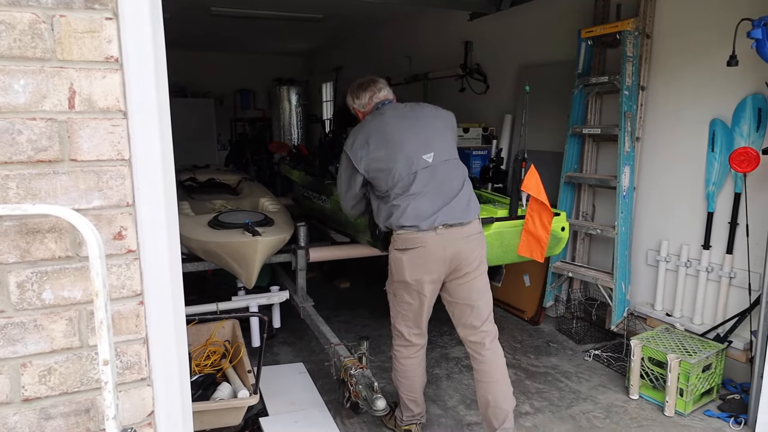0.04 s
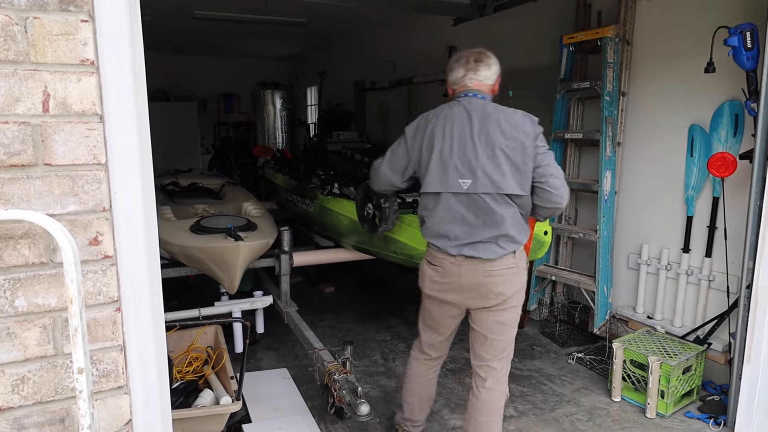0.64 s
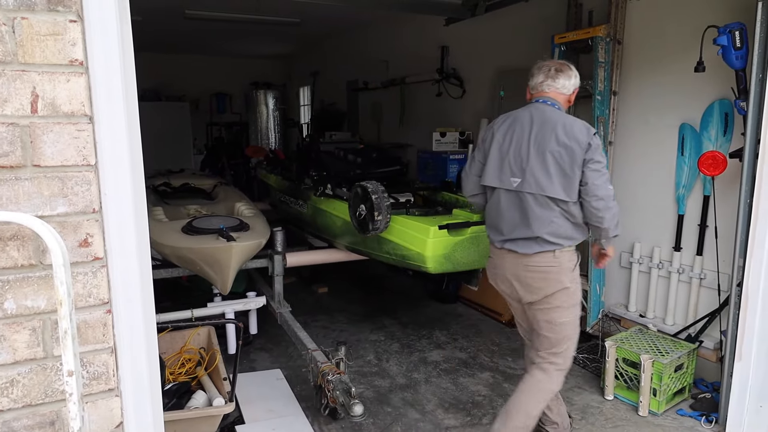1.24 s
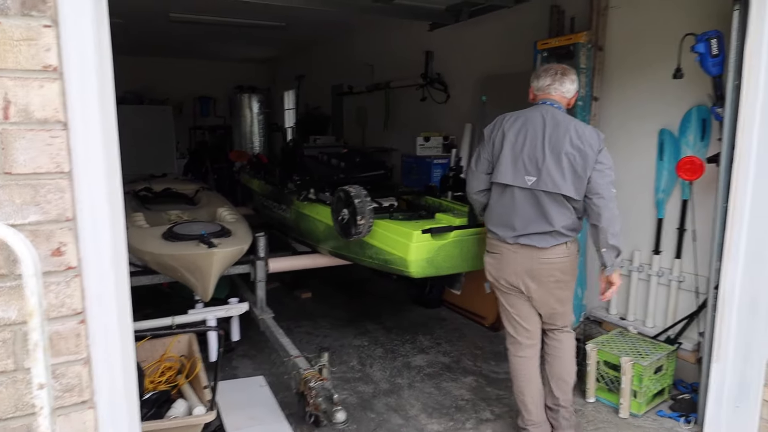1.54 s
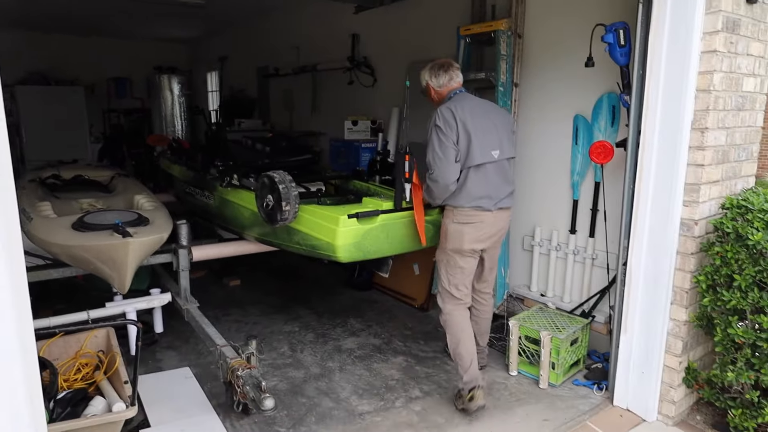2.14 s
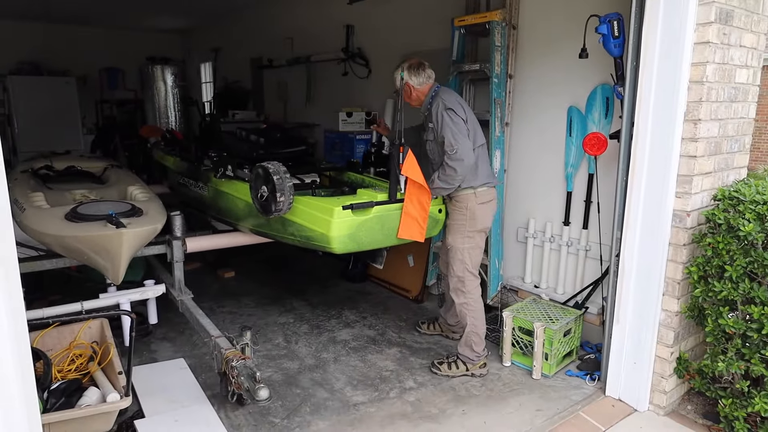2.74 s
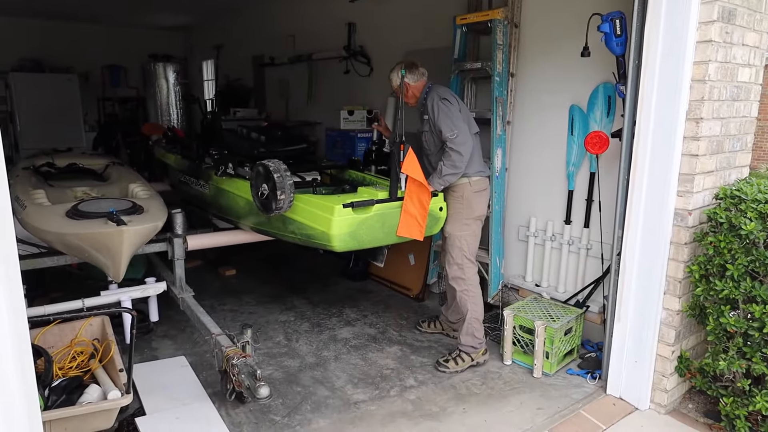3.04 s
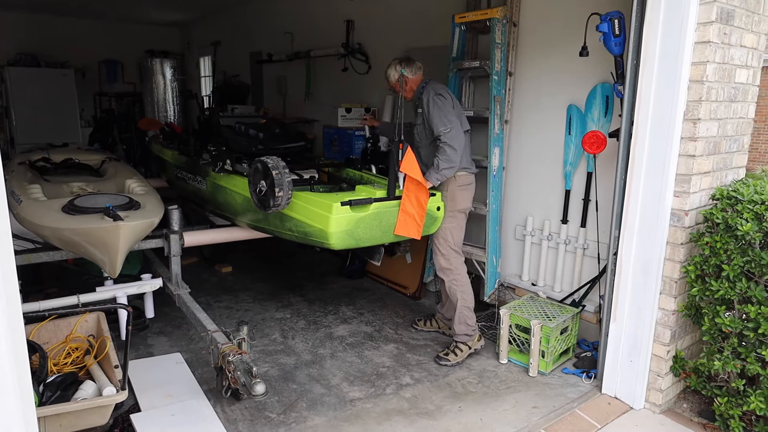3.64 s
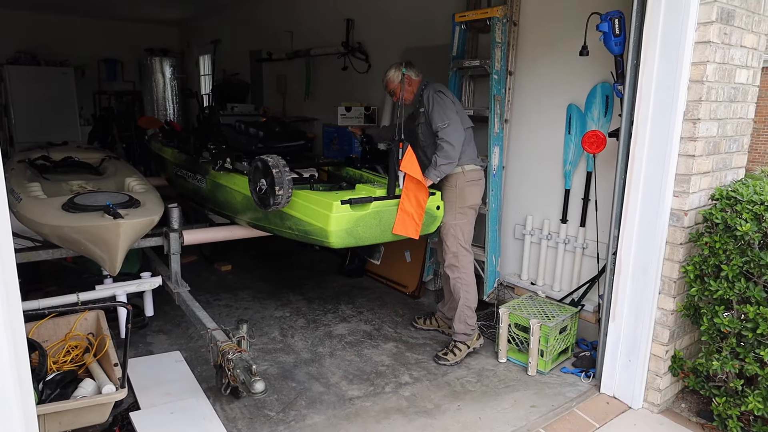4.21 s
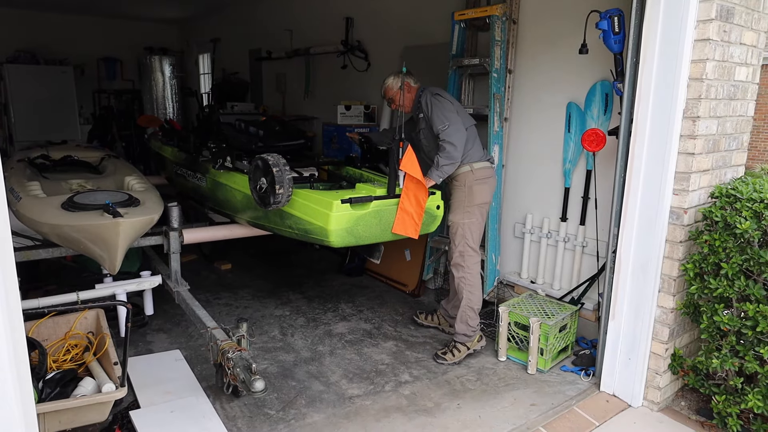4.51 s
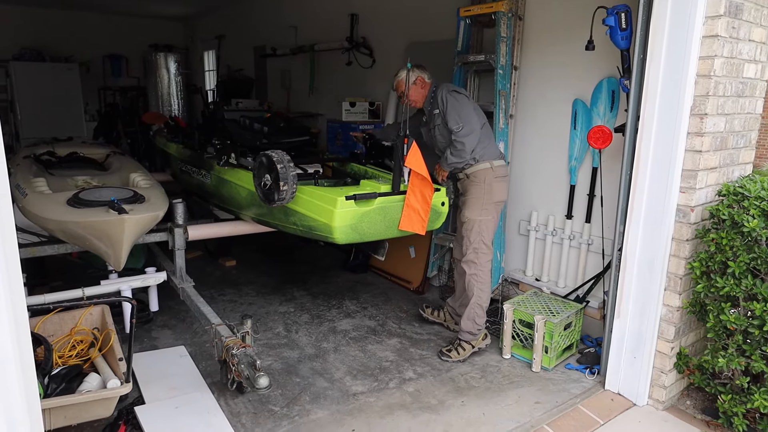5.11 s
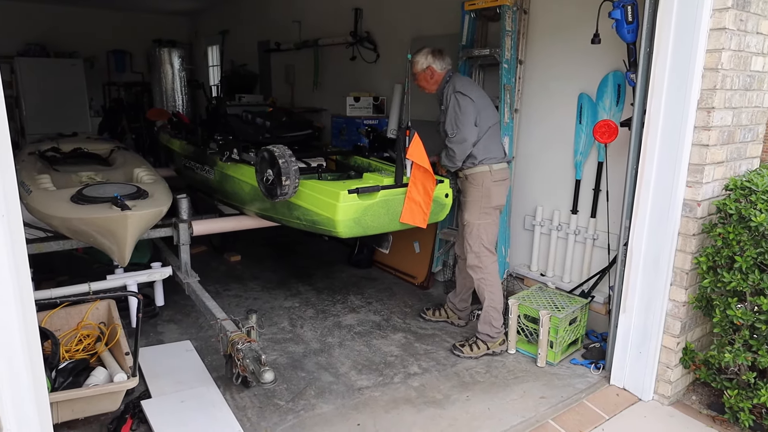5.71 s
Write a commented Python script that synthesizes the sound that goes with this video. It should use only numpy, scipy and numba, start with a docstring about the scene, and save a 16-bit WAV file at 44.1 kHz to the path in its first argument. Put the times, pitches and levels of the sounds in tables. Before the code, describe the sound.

In an open garage, a metal wheel leg on a plastic kayak snaps loudly into place, ringing briefly as the hollow hull booms. Soft footsteps, light taps and rubbing clothes follow. A second leg knocks loose and snaps home just as loudly, then quiet handling continues. A faint pump-like buzz and soft outdoor air run underneath, and the microphone picks up a short room echo.

```python
"""First you hear a steady buzz, like a small pump, in soft outdoor air, with a low rumble and a rustle.
A man in an open garage swings up the two stern wheels of a plastic kayak, walking round between them.
His clothes rub, his shoes scuff, and the hollow hull rumbles as he leans on it. Each metal leg knocks
loose and snaps into its stop, so the leg rings and the hull booms. A limiter (an automatic volume
control) squashes the two loud snaps, which makes the garage's echo stand out."""
import sys
import numpy as np
from scipy import signal
from scipy.fft import rfft, irfft
from scipy.io import wavfile
from scipy.ndimage import uniform_filter1d
from numba import njit

SR = 44100
rng = np.random.default_rng(int(sys.argv[2]) if len(sys.argv) > 2 else 0)


def to_wav(sig):
    """Store sig (one row per channel, or 1-D mono) as 16-bit WAV at the path in sys.argv[1].

    Samples outside -1..1 are clipped; the rate is SR.
    """
    pcm = np.clip(np.atleast_2d(sig), -1, 1) * 32767
    pcm = np.round(pcm).astype(np.int16)
    wavfile.write(sys.argv[1], SR, pcm.T)  # frames by channels


N = 254016
TIME = np.arange(N) / SR
TAIL = np.arange(SR) / SR  # one second, for sounds that die away

# Levels in the tables are relative. The pump's strongest harmonics: f/Hz, level/dB
PUMP_STRONG = [(672.9, -56.5), (726.7, -59.5), (893.6, -59.5), (952.8, -53), (1007, -61), (1120, -75.5),
               (1174, -52), (1233, -51), (1287, -56), (1340, -48.5), (1400, -47.5), (1567, -67),
               (1620, -52), (1846, -66.5)]
# outline of its weaker harmonics: f/Hz, level/dB
PUMP_FAINT = [(56, -67), (112, -64.5), (280, -63.5), (500, -72), (1500, -66), (2300, -71), (2950, -64.5),
              (3250, -84.5), (4100, -71.5), (4700, -83.5), (5200, -82), (5600, -104), (6200, -108)]
# its treble over time: t/s, level/dB
PUMP_BRIGHTNESS = [(0, -6.5), (2.9, -2.5), (4.4, 1), (5.7, 3)]
# tone of the outdoor air: f/Hz, level/dB
AIR_TONE = [(20, -28.5), (40, -10.5), (60, 3), (110, 6.5), (180, -9), (320, 0.5), (500, -10), (1300, -0.5),
            (2000, -6.5), (3000, -20.5), (5000, -22.5), (6200, -63.5), (8000, -63), (16000, -75)]
# pushes on the hull: t/s, rise/s, level/dB
HULL_PUSHES = [(0.0, 0.087, -38.5), (0.201, .12, -28), (.76, 0.057, -28.5), (1.14, 0.062, -41),
               (2.33, 0.07, -44), (2.561, 0.14, -37), (3.03, 0.084, -40), (3.141, 0.056, -46),
               (3.331, 0.13, -27), (4.07, 0.043, -33), (4.43, 0.15, -37.5), (4.86, 0.098, -44.5),
               (5.02, 0.24, -42.5), (5.221, 0.15, -37), (5.57, 0.074, -46)]
# tone of their rumble: f/Hz, level/dB
PUSH_TONE = [(40, -14), (90, -0.5), (165, 4.5), (300, 1), (450, -8.5), (900, -13), (2000, -65)]
# strokes of sleeves and soles: t/s, rise/s, level/dB, brightness/(dB per octave)
RUB_STROKES = [(0.0, 0.069, -43, -9), (1.08, 0.089, -49, 2), (1.42, 0.18, -44.5, -1), (2.07, 0.15, -40, -5),
               (2.18, 0.13, -48.5, 13.5), (2.358, 0.054, -39.5, -7), (2.56, 0.054, -38, 0),
               (2.96, .14, -45.5, 1), (3.15, .06, -43.5, 2.5), (4.26, 0.028, -49.5, -3.5),
               (4.44, 0.14, -49.5, -1), (4.64, 0.052, -41.5, 0), (5.26, 0.11, -49, 1.5),
               (5.45, 0.14, -49.5, 2)]
# tone of that rubbing: f/Hz, level/dB
RUB_TONE = [(300, -32), (800, -21), (2200, 12), (3500, 7.5), (5500, -6.5), (7200, -30.5), (9000, -69),
            (12000, -61)]
# steps and light taps, each with one resonance (a peak in its tone):
# t/s, level/dB, peak f/Hz, peak height/dB, treble slope/(dB per octave), hull thump/dB
STEPS_AND_TAPS = [(.246, -36, 2000, 19, -31, -5), (0.276, -34, 500, -2, -22, 16.5),
                  (.592, -12.5, 7800, -17, 15, 2), (0.953, -36, 2650, 2, -21.5, 0),
                  (1.205, -36.5, 900, 9, -31, 4.5), (1.227, -32.5, 3000, 8, -7, -20),
                  (1.622, -33.5, 800, 5, -9, -8), (1.683, -33, 950, 15, -9, -15.5),
                  (1.702, -31, 800, 16, -12, -14), (2.037, -41, 860, 15, -18, -5),
                  (2.053, -36.5, 4500, 10, -11, -14), (2.352, -40.5, 720, 27, -16, 8),
                  (2.409, -36, 830, 19, -6.5, -19), (2.596, -29.5, 2200, 10, -9, -18),
                  (2.634, -38.5, 3000, 7, -2.5, -12), (3.212, -31.5, 2000, 5.5, -11.5, 2),
                  (3.369, -34, 1394, 1, -9.5, 2.5), (4.685, -37, 3350, 25, 6, -14),
                  (4.708, -28.5, 3300, 11, -5, 0), (5.308, -35.5, 1900, 14, -14, 15),
                  (5.501, -35, 1800, 1, -27, 9.5)]
# tone of struck plastic: f/Hz, level/dB
CONTACT_TONE = [(25, -43.5), (60, -4.5), (130, -3), (250, 1), (500, 0), (900, -3), (1700, 2), (3500, -3.5),
                (5200, -7.5), (7500, -16.5), (10500, -27), (14000, -39), (16000, -43.5)]
# notes the hollow hull rings at: f/Hz, level/dB, time to fade by 60 dB/s
HULL_MODES = [(110.7, -13.5, .42), (154, -8.5, 0.47), (165.5, 3, 0.31), (207.7, -6.5, 0.18),
              (222.2, -4.5, 0.34), (256.6, -3.5, 0.39), (296.3, 1, 0.35), (348, -8, 0.44),
              (407, -9.5, 0.13), (578, -14.5, 0.58), (717, -7.5, 0.27)]
# blows of the wheel legs: t/s, level/dB, peak f/Hz, peak height/dB, peak width/octaves,
# treble slope/(dB per octave), hull thump/dB, leg ring/dB, pan to the left/dB
LEG_BLOWS = [(0.301, -14.5, 2600, 1.5, 0.38, -11.5, 10.5, -7, 2),
             (.316, 30, 2360, 5, 0.25, 4, -7, -1.5, -1), (0.704, -7.5, 2100, 8.5, 0.34, -25, 1, -1.5, -2),
             (3.398, -14, 1225, 10.5, 0.27, -5, -2.5, -4.5, -1),
             (3.422, -25, 250, 1.5, 0.48, -6.5, 15.5, -8.5, 0),
             (3.445, -11, 2600, 11.5, 0.058, 3, 4, -14, -1.5), (3.628, 25.5, 4550, 8, 0.26, 6, -6.5, 0, 0)]
# resonances of each metal leg: f/Hz, width/Hz, height/dB
LEFT_LEG_MODES = [(1780, 43, 5.5), (1920, 52, 9.5), (2033, 25, -4.5), (2163, 66, -4), (2244, 45, 7.5),
                  (3376, 48, 15.5), (3760, 49, -1.5), (3745, 26, 12.5), (3540, 63, 15.5), (4310, 96, 12),
                  (4900, 12, 12.5)]
RIGHT_LEG_MODES = [(1600, 19, 13.4), (1720, 40, 5), (2576, 84, 9.9), (3270, 70, 4), (3280, 110, 6),
                   (3330, 40, 14), (3620, 21, 11), (4650, 60, 4), (4650, 52, 4), (4914, 16, 9.7),
                   (6990, 240, 6.6)]


def undb(db):
    """Turn decibels into a gain."""
    return 10 ** (np.asarray(db) / 20)


def pan(left_db):
    """Left and right gains that differ by left_db."""
    return undb(np.array([[left_db], [-left_db]]) / 2)


def fade(t60):
    """One second of decay, falling 60 dB every t60 seconds."""
    return np.exp(-np.log(1000) * TAIL / t60)


def spectrum(points, hz):
    """Read the level at hz from a curve of (Hz, dB) points."""
    f, db = np.transpose(points)
    return np.interp(np.log(hz + 1), np.log(f), db)


def noise(size, apart_hz=2300):
    """Stereo noise: left and right are alike in the bass, unrelated in the treble."""
    hz = np.fft.rfftfreq(size, 1 / SR)
    alike = .99 / (1 + (hz / apart_hz) ** 2)
    mid, side = rfft(rng.standard_normal((2, size)))
    spread = np.array([[1], [-1]]) * side * np.sqrt((1 - alike) / 2)
    return irfft(mid * np.sqrt((1 + alike) / 2) + spread, size)


def tint(x, points):
    """Give a steady sound a tone curve, at an rms level of 1."""
    gains = undb(spectrum(points, np.fft.rfftfreq(N, 1 / SR)))
    shaped = irfft(rfft(x) * gains, N)
    return shaped / np.sqrt(np.mean(shaped ** 2))


def drift(rate):
    """A smooth random wobble with rate new values a second."""
    hold = int(SR / rate)
    steps = np.repeat(rng.standard_normal(N // hold + 1), hold)
    return 1.3 * uniform_filter1d(uniform_filter1d(steps, hold), hold)[:N]


def shelf(x, hz, db):
    """Turn everything above hz up or down by db, which may move over time."""
    low = signal.sosfiltfilt(signal.butter(2, hz, fs=SR, output="sos"), x)
    return low + (x - low) * undb(db)


def pump(turn_hz=55.92, tick_width=0.11, wander=0.000658, left_lead_s=0.00019, size=4096):
    """Two valve ticks repeat on every turn, making a buzz of clean harmonics that slowly brightens."""
    turn = np.arange(size) / size
    ticks = 0.1 + sum(np.exp(-.5 * ((turn - at) / tick_width) ** 2) for at in (.29, .74))
    hz = turn_hz * np.arange(size // 2 + 1)
    db = spectrum(PUMP_FAINT, hz) + 2 + 2 * rng.standard_normal(len(hz))
    for line_hz, line_db in PUMP_STRONG:
        db[int(round(line_hz / turn_hz))] = line_db - 0.5
    phase = np.angle(rfft(ticks * rng.standard_normal(size)))
    lead = 2 * np.pi * hz * left_lead_s * np.array([[.5], [-.5]])  # the pump stands to the left
    cycle = irfft(undb(db) * (hz < 6500) * np.exp(1j * (phase + lead))) * size / np.sqrt(2)
    turns = np.cumsum(turn_hz * (1 + wander * drift(2))) / SR
    buzz = np.array([np.interp(turns % 1, turn, side) for side in cycle]) * undb(0.3 * drift(12))
    return shelf(buzz, hz=3000, db=np.interp(TIME, *np.transpose(PUMP_BRIGHTNESS)))


def outdoors(air_db=-46, hum_db=-57, hum_hz=59.2):
    """Soft outdoor air and the low hum of a far motor."""
    air = tint(noise(N, apart_hz=1030), AIR_TONE) * undb(air_db + 2.0 * drift(3.1))
    hum = undb(hum_db + drift(1.2)) * np.sqrt(2) * np.sin(2 * np.pi * hum_hz * TIME)
    return air + hum


def swell(start_s, rise_s, release_s):
    """Loudness of one movement: it builds smoothly, then dies away."""
    since = TIME - start_s
    rise = np.sin(np.pi / 2 * np.clip(since / rise_s, 0, 1)) ** 2
    return rise * np.exp(-np.maximum(since - rise_s, 0) / release_s)


def pushing(gain_db=-3):
    """The hollow hull rumbles each time it is leaned on."""
    effort = sum(undb(db) * swell(t, rise_s, release_s=0.1) for t, rise_s, db in HULL_PUSHES)
    return undb(gain_db) * effort * tint(noise(N), PUSH_TONE)


def rubbing(grain_db=3, gain_db=-2):
    """Cloth and soles rub in grainy strokes, each with its own brightness."""
    friction = noise(N) * undb(grain_db * drift(350))
    out = np.zeros((2, N))
    for t, rise_s, db, slope_db in RUB_STROKES:
        tone = [(hz, level + slope_db * np.log2(hz)) for hz, level in RUB_TONE]
        out += undb(db + gain_db) * swell(t, rise_s, release_s=0.051) * tint(friction, tone)
    return out


def add(out, t, sound):
    """Mix a sound in at t seconds."""
    start = int(t * SR)
    out[:, start:start + sound.shape[1]] += sound[:, :N - start]


def struck_spot(hz, height_db, width, slope_db, leg=(), ring_db=0, knee_hz=2500, size=4096):
    """How a spot answers a knock: one broad peak, a dull or bright top, and any ring of a metal leg."""
    f = np.fft.rfftfreq(size, 1 / SR) + 1
    peak_db = height_db * np.exp(-.5 * (np.log2(f / hz) / width) ** 2)
    top_db = slope_db * np.log2(np.maximum(f / knee_hz, 1))
    metal = sum(undb(db + ring_db) ** 2 / (1 + (2 * (f - centre) / wide) ** 2)
                for centre, wide, db in leg)
    tone_db = spectrum(CONTACT_TONE, f) + peak_db + top_db + 10 * np.log10(1 + metal)
    # turn the tone curve into a click that starts at once, then rings (minimum phase)
    cepstrum = irfft(np.log(undb(tone_db)))
    cepstrum[1:size // 2] *= 2
    cepstrum[size // 2 + 1:] = 0
    click = irfft(np.exp(rfft(cepstrum)))
    return click / np.linalg.norm(click)


def contact(click, rise_s, clatter_t60, crack_db, echo_db=-9):
    """A crack and a short clatter of loose parts shake the struck spot, and the garage echoes."""
    envelope = (fade(clatter_t60) + undb(crack_db) * fade(0.017)) * (1 - fade(rise_s))
    direct = signal.fftconvolve(noise(SR) * envelope, click[None], axes=1)[:, :SR]
    return direct + undb(echo_db) * garage(click)


def garage(x, bands_hz=(400, 3800, 9500), t60s=(0.45, 0.39, 0.39)):
    """The cluttered garage scatters sound into a smooth echo; the bass lasts longest."""
    hz = np.fft.rfftfreq(SR, 1 / SR)
    wash = rfft(noise(SR))
    shares = [np.interp(np.log(hz + 1), np.log(bands_hz), row) for row in np.eye(3)]
    echo = sum(irfft(wash * share) * fade(t60) for share, t60 in zip(shares, t60s))
    return signal.fftconvolve(echo * (1 - fade(0.0074)), x[None], axes=1)[:, :SR]


def hull_boom(waver_hz=30, rise_s=0.11):
    """The hollow hull's low notes swell, waver and die away."""
    out = np.zeros(SR)
    for hz, db, t60 in HULL_MODES:
        waver = 1 + drift(waver_hz)[:SR] + 1j * drift(waver_hz)[:SR]
        note = np.exp(2j * np.pi * (hz * TAIL + rng.random()))
        out += undb(db) * fade(t60) * np.imag(waver * note)
    return out * (1 - fade(rise_s))


def steps_and_taps(soft_hz=7700):
    """Soles on concrete and hands on the fittings make soft knocks, with a thump from the hull."""
    out = np.zeros((2, N))
    for t, db, hz, height_db, slope_db, thump_db in STEPS_AND_TAPS:
        click = struck_spot(hz, height_db, width=0.38, slope_db=slope_db)
        hit = contact(click, rise_s=0.0091, clatter_t60=0.12, crack_db=-20)
        add(out, t, undb(db) * (hit + undb(thump_db - 20.5) * hull_boom()))
    # rubber and skin give no crisp top
    return signal.sosfilt(signal.butter(4, soft_hz, fs=SR, output="sos"), out)


def wheel_legs():
    """Each blow cracks, thumps the hull and rings a metal leg: first the left one, later the right."""
    out = np.zeros((2, N))
    for t, db, hz, height_db, width, slope_db, thump_db, ring_db, pan_db in LEG_BLOWS:
        leg = LEFT_LEG_MODES if t < 2 else RIGHT_LEG_MODES
        click = struck_spot(hz, height_db, width, slope_db, leg, ring_db)
        hit = contact(click, rise_s=0.00033, clatter_t60=0.056, crack_db=-15) * pan(pan_db)
        add(out, t, undb(db) * (hit + undb(thump_db - 19.5) * hull_boom()))
    return out


def scene():
    """The work on the kayak, a little to the right, over the steady background."""
    work = wheel_legs() + steps_and_taps() + rubbing() + pushing()
    return work * pan(-0.5) + pump() + outdoors()


@njit
def volume_cut(over_db, hold_s, db_per_s):
    """The limiter's cut in dB: it jumps to meet each peak, waits, then eases off."""
    out, cut, wait = np.empty(len(over_db)), 0., 0.
    for i in range(len(over_db)):
        if over_db[i] > 0 and over_db[i] >= cut:
            cut, wait = over_db[i], hold_s
        elif wait > 0:
            wait -= 1 / SR
        else:
            cut = max(cut - db_per_s / SR, 0.)
        out[i] = cut
    return out


def record(dry, ceiling_db=-5, slow_depth_db=8, treble_dip=1.64, top_hz=15000):
    """A limiter squashes peaks and lets go fast, then slowly.
    Separately, the treble is turned down briefly after each loud snap, and the very top is cut."""
    power = np.maximum(uniform_filter1d(np.mean(dry ** 2, axis=0), size=96), 1e-12)
    over_db = 10 * np.log10(power) - ceiling_db
    fast = volume_cut(over_db, hold_s=0.066, db_per_s=145.)
    slow = volume_cut(np.minimum(over_db, slow_depth_db), hold_s=0.41, db_per_s=40.)
    cut_db = uniform_filter1d(np.maximum(fast, slow), size=24)
    limited = np.tanh(dry * undb(-cut_db))  # rounds off the remaining peaks
    dipped = shelf(limited, hz=2900, db=-treble_dip * np.maximum(slow - fast, 0))
    return signal.sosfilt(signal.ellip(8, .2, 80, top_hz, fs=SR, output="sos"), dipped)


dry = scene()
out = record(dry)
to_wav(out)
```